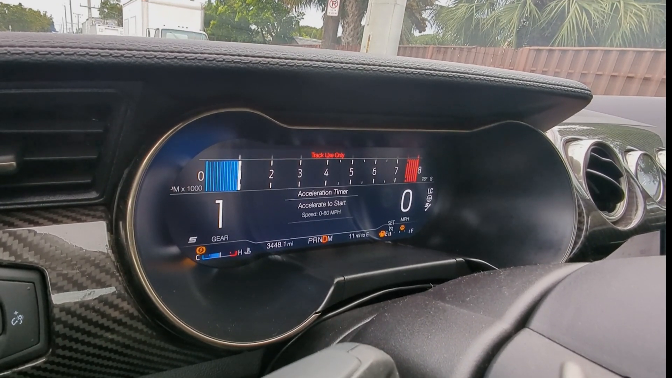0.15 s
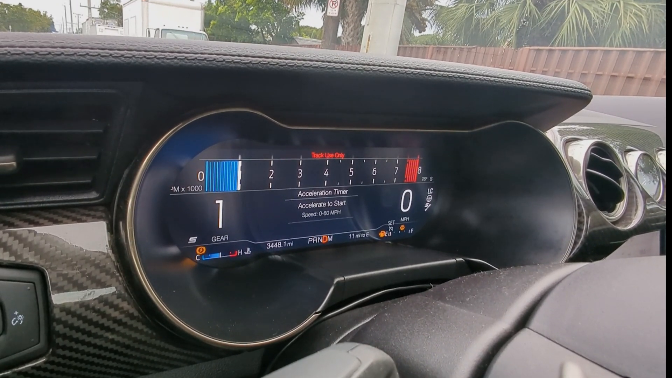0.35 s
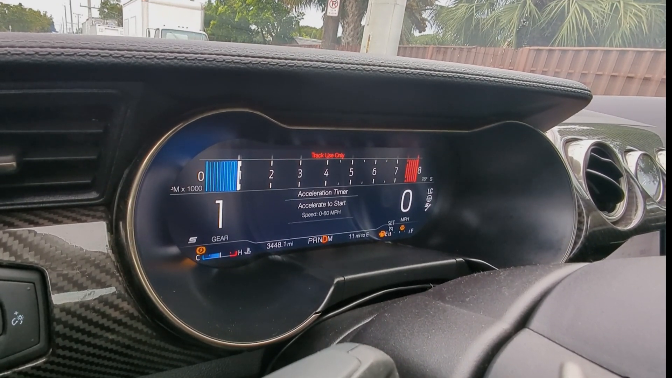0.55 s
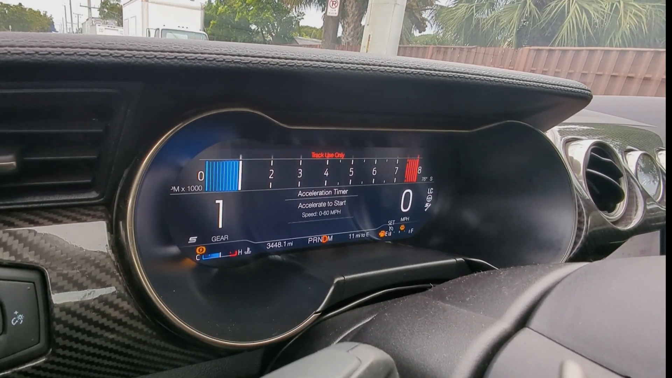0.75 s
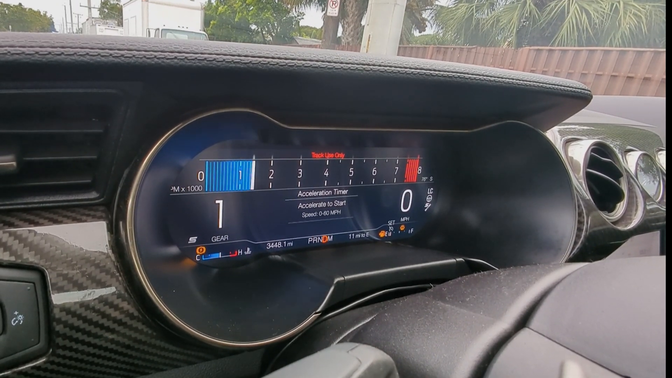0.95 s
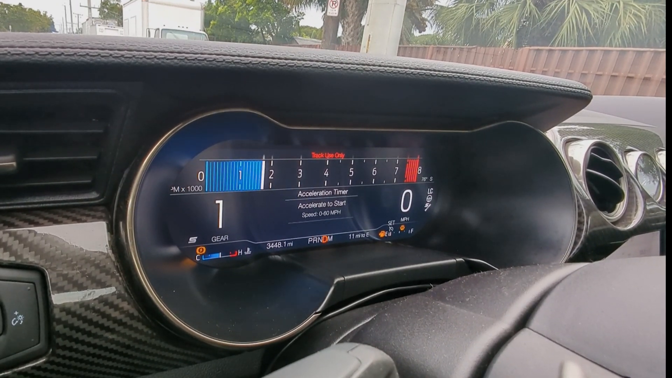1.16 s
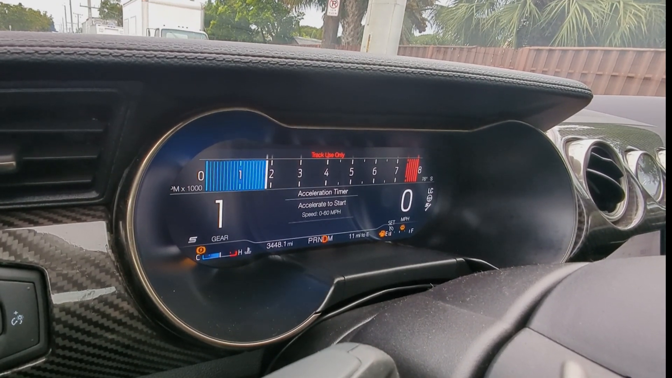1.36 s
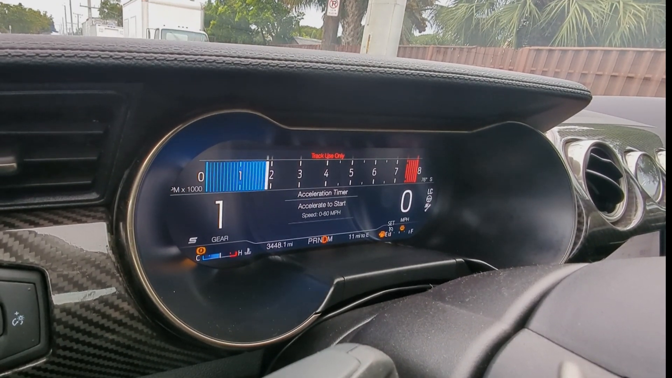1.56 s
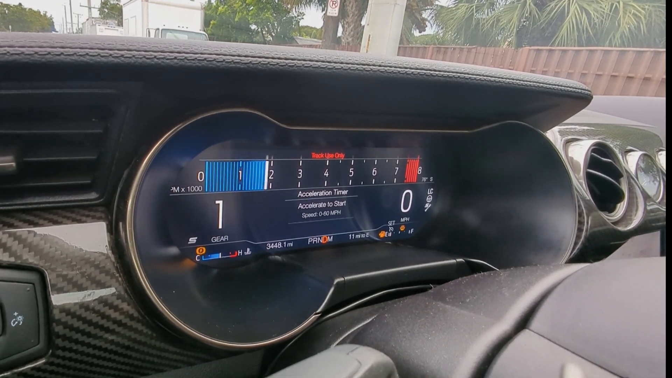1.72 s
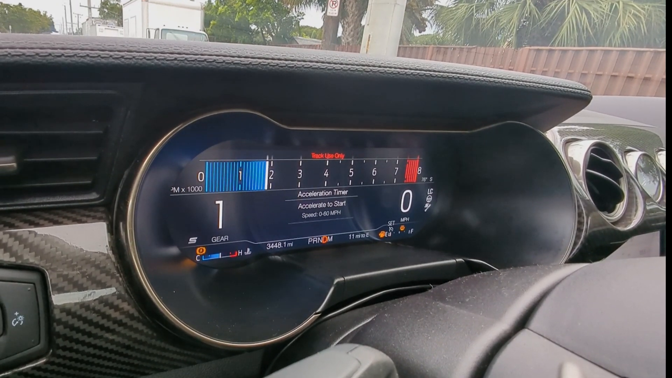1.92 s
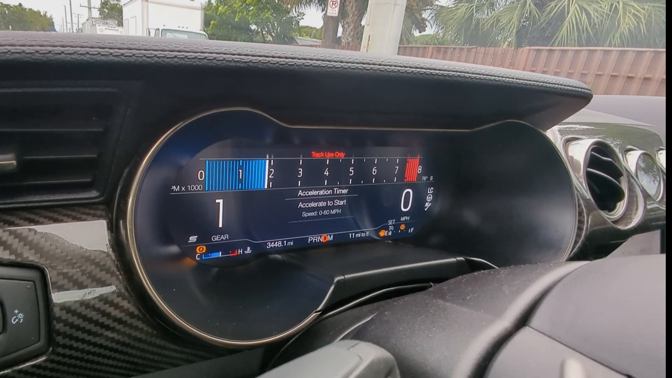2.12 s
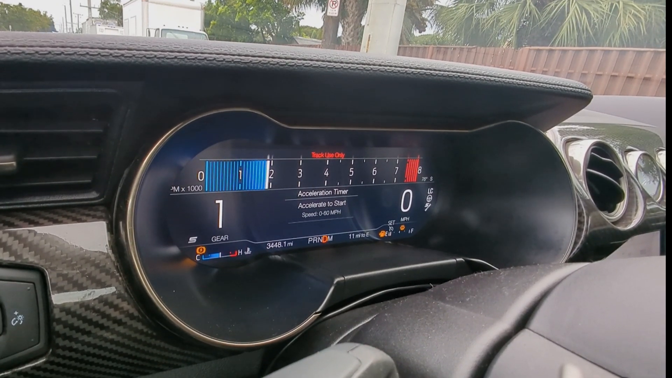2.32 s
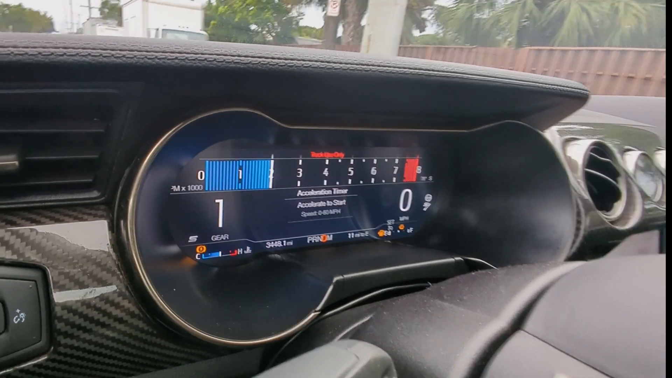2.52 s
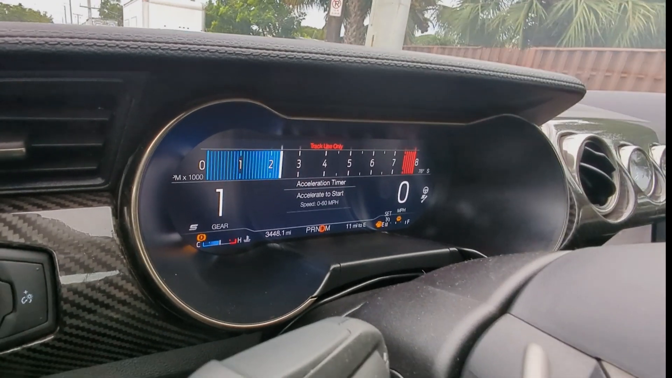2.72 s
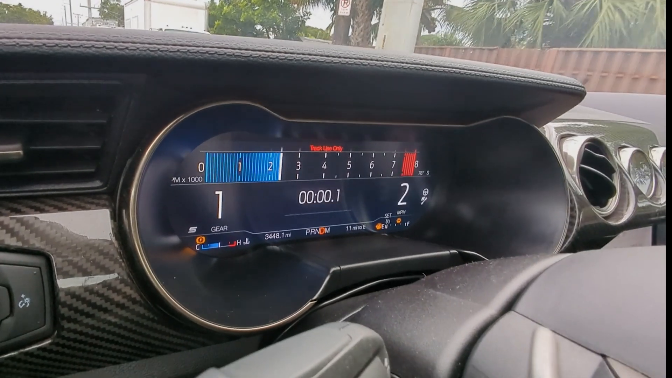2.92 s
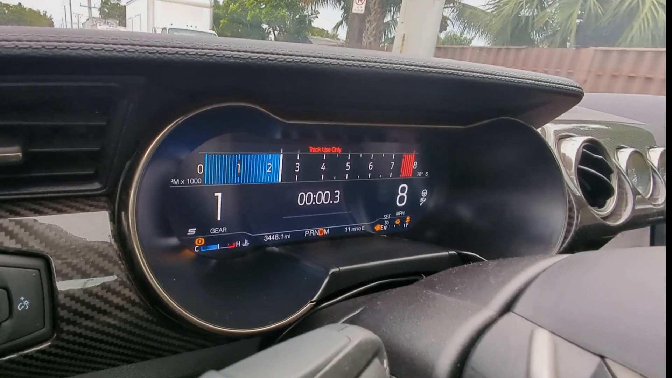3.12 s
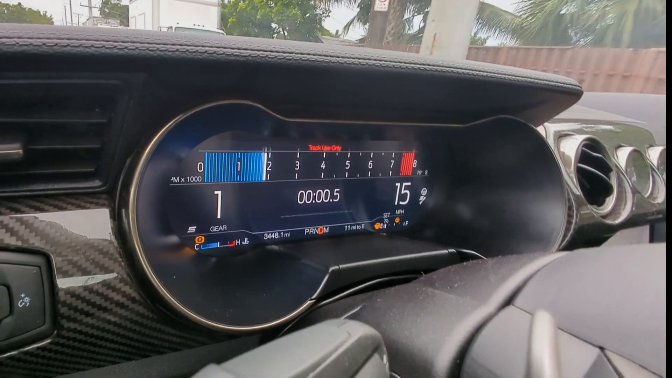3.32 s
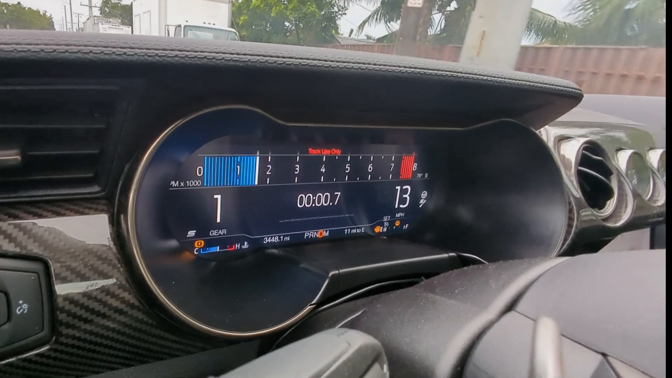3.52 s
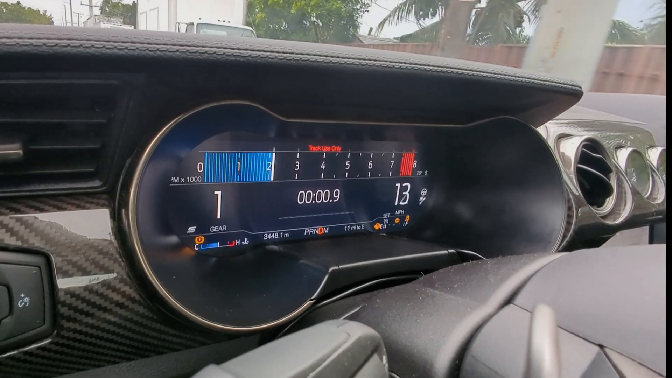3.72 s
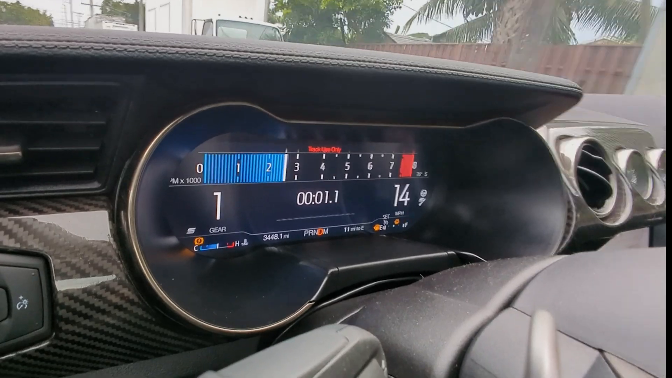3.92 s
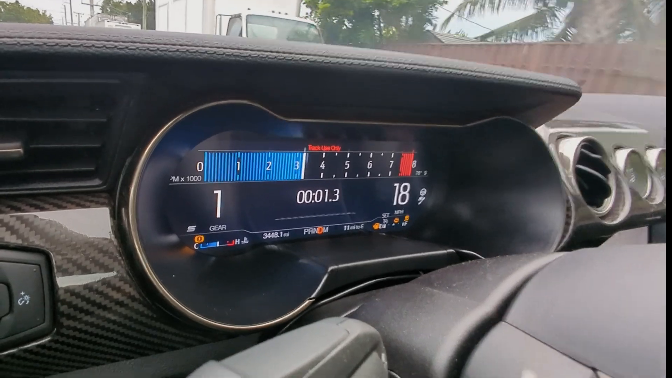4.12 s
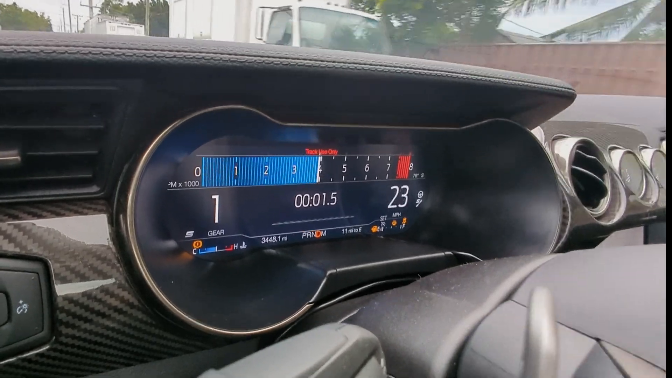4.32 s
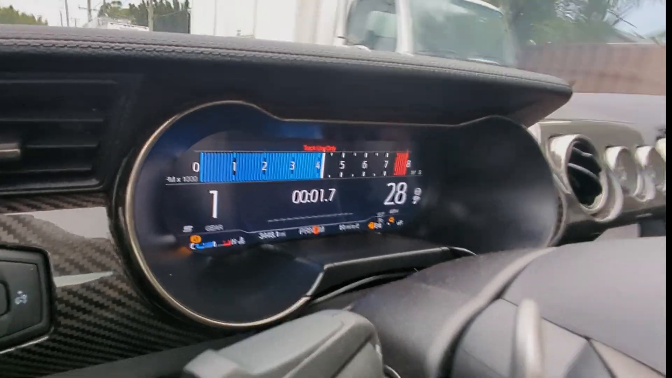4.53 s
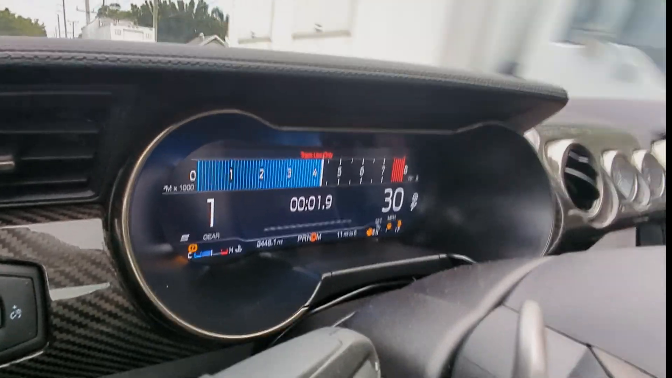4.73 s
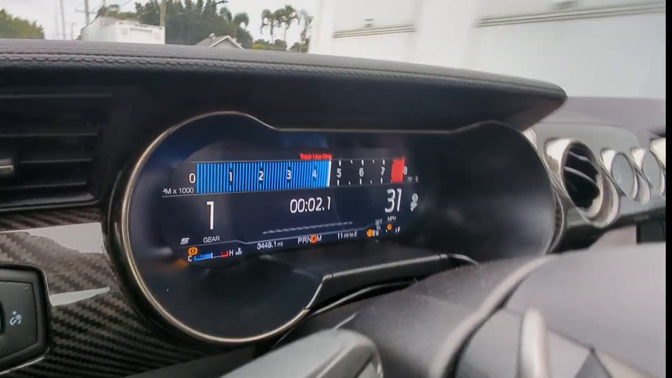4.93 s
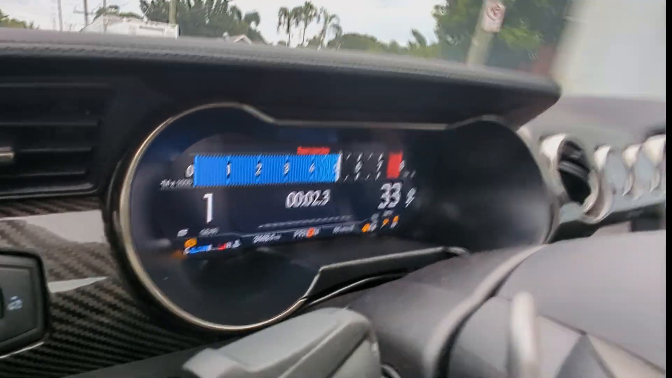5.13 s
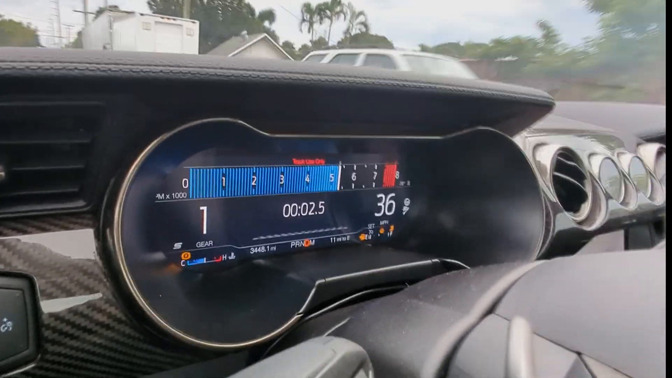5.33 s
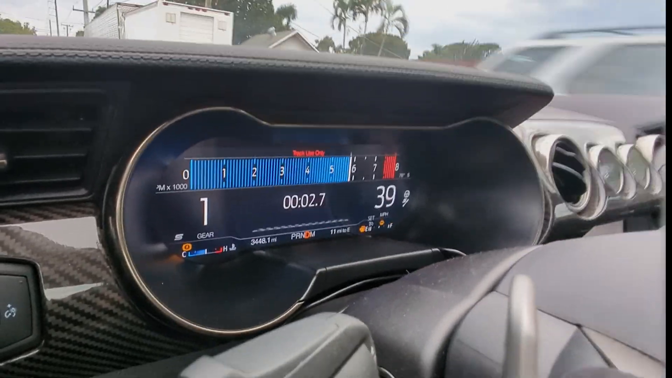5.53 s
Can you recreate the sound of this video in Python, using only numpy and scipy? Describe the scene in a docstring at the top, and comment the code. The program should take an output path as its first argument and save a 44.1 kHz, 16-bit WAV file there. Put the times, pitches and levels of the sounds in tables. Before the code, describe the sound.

Close inside a car cabin, a big V8 idles low and lumpy over faint vent hiss. Revs rise and hold, chopped by a stuttering limiter. It launches with a loud surge, a short tyre moan, air roar and trim rattle, sags, then climbs through more tyre moans and supercharger whine into a hard roar, briefly cut once, rising until the end.

```python
"""A supercharged V8 heard in the cabin: idle, revs held by a stuttering launch limiter, then a hard pull in first gear.
The engine is sine waves locked to its turning, plus puffs of noise: a firing note and uneven half orders.
The blower whines in multiples of its lobe rate, the tyres moan in gliding tones as they bite,
and the trim ticks in short noise bursts. Intake roar, thin hiss, road and ventilation are shaped noise."""
import sys
import numpy as np
from scipy import signal
from scipy.fft import rfft, irfft, next_fast_len
from scipy.io import wavfile
from scipy.ndimage import uniform_filter1d, minimum_filter1d, map_coordinates

SR = 44100
rng = np.random.default_rng(int(sys.argv[2]) if len(sys.argv) > 2 else 0)


def waveform_to_disk(signal):
    """Save audio, clipped to [-1, 1], as 16-bit WAV at the path in sys.argv[1]."""
    frames = np.transpose(np.atleast_2d(signal))
    scaled = np.clip(frames, -1, 1) * 32767
    samples = np.round(scaled).astype(np.int16)
    wavfile.write(sys.argv[1], SR, samples)


N = 249606  # length in samples

# how strongly the cabin passes a clean engine tone: pitch_hz, level_db
CABIN_DRONE = [(60, -15.5), (100, -13), (125, -8.5), (150, -5.5), (172, -8), (200, -14), (220, -17.5),
               (256, -14.5), (275, -13), (310, -17), (350, -11.5), (378, -8), (388, -23), (420, -24.5),
               (560, -28), (800, -27.5)]


def amp(db):
    """Turn decibels into a gain."""
    return 10 ** (np.asarray(db) / 20)


def unit(x):
    """Scale x to an average strength (rms) of 1."""
    return x / np.sqrt(np.mean(x ** 2) + 1e-20)


def along(points, hz):
    """Read a value at each frequency from (Hz, value) points, on a log frequency axis."""
    point_hz, values = np.transpose(points)
    return np.interp(np.log(hz + 1), np.log(point_hz + 1), values)


def curves(rows):
    """Draw straight lines between timed rows: one curve for each column after the time."""
    times_s, *columns = np.transpose(rows)
    return [np.interp(np.arange(N) / SR, times_s, column) for column in columns]


def wobble(rate):
    """A random curve of straight lines joining `rate` points a second."""
    knots = rng.standard_normal(int(N * rate / SR) + 4)
    return map_coordinates(knots, [np.arange(N) * rate / SR], order=1)


def filtered(x, response, mirror="odd"):
    """Filter x by a frequency response, with a fading mirror image after its end to avoid a sudden stop."""
    m = next_fast_len(N + SR // 2)
    widths = [(0, 0)] * (x.ndim - 1) + [(0, 300)]
    longer = np.pad(x, widths, mode="reflect", reflect_type=mirror)
    longer[..., N:] *= np.hanning(600)[300:]
    spectrum = rfft(longer, m) * response(np.fft.rfftfreq(m, 1 / SR))
    return irfft(spectrum, m)[..., :N]


def colour(points):
    """Make a filter whose gain follows (Hz, dB) points and which never sounds ahead of its input."""
    def response(hz):
        cepstrum = irfft(np.log(amp(along(points, hz)) + 1e-6))
        # folding the second half onto the first gives the minimum-phase filter
        cepstrum[1:len(cepstrum) // 2] *= 2
        cepstrum[len(cepstrum) // 2 + 1:] = 0
        return np.exp(rfft(cepstrum, 2 * len(hz) - 2))
    return response


def two_ears(x):
    """Bass reaches both sides alike; higher up each side gets its own mix of cabin paths."""
    # likeness of left and right (1 = the same): pitch_hz, likeness
    likeness = [(30, .995), (60, .98), (130, .998), (290, .93), (640, .2), (1000, 0)]
    # balance between the sides: pitch_hz, left_minus_right_db
    lean = [(60, 1), (110, 0), (200, 0), (380, 2), (700, 6.5), (1290, 1), (2400, 0)]

    def response(hz):
        turn = np.arccos(np.clip(along(likeness, hz), -1, 1)) / 2
        angles = np.cumsum(rng.normal(0, 1.5, size=1000))  # random phases, 25 Hz apart
        paths = np.exp(1j * np.interp(hz, np.arange(1000) * 25, angles))
        side = np.sin(turn) * paths
        sides = np.array([np.cos(turn) + side, np.cos(turn) - side])
        return sides * amp(np.outer([.5, -.5], along(lean, hz)))
    return filtered(x, response)


def hiss(spectrum, patchy_db):
    """Unrelated noise for each side, rms 1, with random patches of gain in time and frequency."""
    grid = signal.stft(rng.standard_normal((2, N)), nperseg=512)[2]
    patches = uniform_filter1d(rng.standard_normal(grid.shape[1:]), size=6, axis=0)
    patches = uniform_filter1d(patches, size=10, axis=1)
    pair = signal.istft(grid * amp(patchy_db * unit(patches)), nperseg=512)[1][:, :N]
    return unit(filtered(pair, lambda hz: amp(along(spectrum, hz)), mirror="even"))


def engine(hz, turns, open_db, cut_db):
    """The clean firing note, the half orders of eight unequal cylinders and the scatter from firing to firing."""
    # how burning changes with revs; scatter is against half orders, levels are relative:
    # firings_hz, rumble_db, scatter_db, boom_db, bark_db
    burning = [(58.4, -39, -1, 1.5, -0.5), (90, -31.5, -1.5, 5, 4.5), (119.4, -23.5, -0.5, 8, -7),
               (170, -25.5, 1.5, -5.5, 1), (200, -16, -4.5, -5, 1), (270, -18.5, -4, -9.5, 6),
               (325, -16, 0, -8.5, 3.5), (368, -21, 0, -7, 7), (400, -17.5, -4.5, -9, 6.5)]
    # relative strength of the orders in each eighth between firing orders: level_db
    uneven_db = [0, 0.5, -2, -4, -8.5, 0, 2, -2.5]
    # what the cabin makes of the rumble: pitch_hz, level_db
    cabin = [(25, -43.5), (50, -7), (90, -8.5), (125, 1.5), (156, 2.5), (215, -12.5), (255, -8.5),
             (300, -11.5), (365, -6), (410, -21), (500, -13.5), (660, -20), (730, -9), (790, -27.5),
             (1300, -39), (2000, -69.5)]
    note_per_load, rumble_per_load, bark_per_load = 1.096, 0.62, 0.45  # dB per dB of load
    rumble_per_cut = 1.05  # dB of rumble lost per dB of cut
    second_db = -9.5  # second firing order

    load_db = open_db - cut_db
    rumble_db, scatter_db, boom_db, bark_db = [along(np.array(burning)[:, [0, k]], hz) for k in range(1, 5)]

    note_db = note_per_load * open_db - cut_db + along(CABIN_DRONE, hz) + 1.2 * wobble(22)
    note = amp(note_db) * np.sin(2 * np.pi * turns)
    octave_db = load_db + second_db + along(CABIN_DRONE, 2 * hz) + 3 * wobble(10)
    octave = amp(octave_db) * np.sin(4 * np.pi * turns + .5 * wobble(6))

    orders = np.zeros(N)
    for k in range(2, 56):  # eighths of the firing rate
        if k not in (8, 16):  # the clean note and its octave are made above
            drift = rng.uniform(0, 2 * np.pi) + .35 * wobble(5)
            orders += amp(uneven_db[k % 8] + 2.2 * wobble(7)) * np.sin(2 * np.pi * turns * k / 8 + drift)
    orders *= np.sqrt(hz / hz.mean())  # sparser lines carry more power each

    puff = np.exp(2.5 * np.cos(2 * np.pi * turns))  # each firing lets out a puff of turbulent gas
    shape = colour(cabin)
    scatter = unit(filtered(puff * rng.standard_normal(N), shape))
    rumble = unit(filtered(orders, shape)) + amp(scatter_db) * scatter

    # split the rumble near 240 and 600 Hz, then rebalance its parts
    boom = filtered(rumble, lambda f: 1 / (1 + (f / 240) ** 6))
    bark = filtered(rumble, lambda f: 1 / (1 + (600 / (f + 1)) ** 8))
    body = rumble - boom - bark
    parts = body + amp(boom_db) * boom + amp(bark_db + bark_per_load * load_db) * bark
    rumble_gain = amp(rumble_db + rumble_per_load * open_db - rumble_per_cut * cut_db + 6.0)
    return np.sqrt(2) * (note + octave) + rumble_gain * parts


def banks(hz, turns, load_db):
    """The two cylinder banks beat at clean half orders, each wavering a little."""
    # eighths_of_firing_rate, level_db at 300 firings a second, tilt in dB per octave of revs
    bank_orders = [(3, -14, 1), (4, -11.5, 3.5), (5, -12.5, -5), (6, -7, 4), (10, -10, -6)]
    clear_hz, fade_db_per_hz = 210, 1.4  # clear above this firing rate, fading below it
    clear_db = load_db + fade_db_per_hz * np.minimum(0, hz - clear_hz)
    total = np.zeros(N)
    for eighths, db, tilt in bank_orders:
        k = round(eighths)
        revs_db = db + tilt * np.log2(hz / 300)
        level_db = clear_db + revs_db + along(CABIN_DRONE, hz * k / 8) + 1.5 * wobble(12)
        drift = rng.uniform(0, 2 * np.pi) + .25 * wobble(6)
        total += amp(level_db) * np.sin(2 * np.pi * turns * k / 8 + drift)
    return np.sqrt(2) * total


def blower(hz, turns):
    """Lobe tones from the second multiple up; each swells as it crosses a panel mode and breaks up."""
    # the blower sings once the bypass closes; levels before the panels: start_s, lowest_tone_db, upper_tones_db
    whine = [(2.46, -90, -60), (2.54, -42, 1.5), (2.93, -35.5, 0.5), (3.02, -40.5, -19),
             (3.25, -34.5, -24.5), (3.45, -32.5, -22.5), (3.62, -24.5, 0), (3.85, -25, 1),
             (4.1, -31.5, -1.5), (4.4, -39, -2), (4.6, -42.5, -9.5), (4.88, -42, 1), (5.2, -42, 0),
             (5.66, -36.5, -1)]
    # multiples 3 to 7 of the lobe rate: level_db at 1 kHz, tilt in dB per octave
    upper_tones = [(-47.5, 0), (-35.5, -7.5), (-45.5, -6.5), (-43.5, -6), (-43, -8.5)]
    # dash panel modes that pass the whine: pitch_hz, level_db
    panel_modes = [(560, 3), (660, 3.5), (780, -3), (1200, 4), (1500, 4.5), (1700, 0), (1920, 0.5),
                   (2250, 5), (2750, 4.5), (3300, 4.5), (3800, -4), (4450, 0), (5000, 1.5)]
    lobes_per_firing, damping = 2.4, .08

    lowest_db, upper_db = curves(whine)
    lobes = lobes_per_firing * turns + 0.025 * wobble(25)
    levels = [lowest_db]
    for k, (db, tilt) in enumerate(upper_tones, 3):
        octaves = np.log2(k * lobes_per_firing * hz / 1000)
        levels.append(upper_db + db + tilt * octaves)

    tones = np.zeros(N)
    for k, level_db in enumerate(levels, 2):
        fading = amp(8 - 11 * np.abs(wobble(24)) - 3 * np.abs(wobble(8)))
        tones += amp(level_db) * fading * np.sin(2 * np.pi * k * lobes)

    def panels(f):
        total = 0
        for mode_hz, db in panel_modes:
            drag = 1j * f * damping * mode_hz
            total = total + amp(db) * drag / (mode_hz * mode_hz - f * f + drag)
        return total
    return filtered(tones, panels)


def tyres():
    """Tyres stick and slip as they bite: gliding moans with two weak overtones."""
    # one list of rows per moan: start_s, pitch_hz, level_db
    moans = [
        [(2.42, 590, -34), (2.466, 585.5, -17.5), (2.54, 615, -33.5)],
        [(3.36, 507.4, -31), (3.558, 545, -19.5), (3.6, 632, -23)],
        [(3.91, 509.4, -41), (3.942, 472, -20.5), (3.99, 493, -17)],
    ]
    out = np.zeros(N)
    for rows in moans:
        fade_in = (rows[0][0] - .02, rows[0][1], -90)
        fade_out = (rows[-1][0] + 0.026, rows[-1][1], -90)
        hz, db = curves([fade_in, *rows, fade_out])
        phase = 2 * np.pi * np.cumsum(hz) / SR + 0.24 * wobble(60)
        tone = np.sin(phase) + amp(-24) * np.sin(2 * phase) + amp(-33) * np.sin(3 * phase)
        out += np.sqrt(2) * amp(db) * tone
    return out


def trim():
    """Plastic rattles: a grainy burst of contacts dying away, each with its own share of treble."""
    # levels before filtering: start_s, strength_db, treble_db, decay_s (time to fall by 60 dB)
    ticks = [(0.63, -47, 6.5, 0.035), (2.2757, -35.5, -24, .14), (2.6115, -39.5, -7, 0.069),
             (2.6354, -28, -5.5, 0.056), (2.6693, -37.5, -2.5, 0.066), (2.7656, -31, -0.5, 0.065),
             (4.5246, -33.5, -6, .12), (4.5494, -33, -4.5, 0.15), (4.5794, -42, -10, .08),
             (4.6214, -29, -3.5, 0.13), (4.6494, -33.5, -10, .1), (4.9097, -37, -5, .02),
             (5.1692, -23.5, -0.5, .035), (5.2121, -23.5, -3, 0.04), (5.2739, -18, -11.5, .03)]
    body, top = np.zeros((2, N + SR)), np.zeros((2, N + SR))
    t = np.arange(SR // 8) / SR
    for start_s, db, treble_db, decay_s in ticks:
        # each grain holds one random strength for 40 samples
        grains = np.repeat(rng.exponential(size=len(t) // 40 + 1), 40)[:len(t)]
        grains[:40] = 1
        fade = amp(db - 12 - 60 * t / decay_s)
        burst = fade * grains ** .4 * rng.standard_normal((2, len(t)))
        start = round(start_s * SR)
        body[:, start:start + len(t)] += burst
        top[:, start:start + len(t)] += amp(treble_db) * burst
    body_colour = colour([(800, -36.0), (2000, 16.5), (4000, 13.0), (7500, -3.0), (9000, -32.5)])
    top_colour = colour([(5000, -27.5), (8000, 7.5), (12000, 0.5), (15500, -9)])
    return filtered(body[:, :N], body_colour) + filtered(top[:, :N], top_colour)


def intake(turns):
    """Air roar that breathes a little with each firing; a thin hiss and the road's rumble grow with it."""
    # air roar through the drive: start_s, level_db
    air = [(0.0, -66.5), (1.3, -53.5), (2.08, -55.5), (2.44, -49.5), (2.56, -36), (2.74, -31), (2.95, -39),
           (3.25, -52), (3.41, -45), (3.62, -42), (3.86, -39.5), (4.11, -37), (4.52, -39), (4.9, -36.5),
           (5.15, -35), (5.4, -31), (5.66, -34)]
    # intake roar: pitch_hz, level_db per Hz
    roar_spectrum = [(470, -39.5), (800, -11.5), (884, -7.5), (1390, -14.5), (1510, -17.5), (1700, -17),
                     (2270, -18.5), (4490, -35), (7000, -44), (9100, -66.5), (15400, -120)]
    # hiss of belts and road: pitch_hz, level_db per Hz
    fizz_spectrum = [(1760, -31.5), (3000, -8), (4180, -11.5), (6760, -9), (7340, -10), (11600, -15),
                     (15600, -22)]
    # low rumble of the road: pitch_hz, level_db per Hz
    road_spectrum = [(25, -22), (50, -4), (75, 0), (110, -6), (300, -90)]
    full_air_db, full_fizz_db, fizz_per_air = -35, -56.5, .45  # dB, dB, dB per dB of air

    roar_db, = curves(air)
    fizz_db = full_fizz_db + fizz_per_air * (roar_db - full_air_db)
    pulse = 1 + .2 * np.cos(2 * np.pi * turns)
    roar = amp(roar_db + 1.5 * wobble(14)) * pulse * hiss(roar_spectrum, patchy_db=1.5)
    fizz = amp(fizz_db + 2 * wobble(14)) * hiss(fizz_spectrum, patchy_db=1.5)
    road = amp(fizz_db + 29) * hiss(road_spectrum, patchy_db=5.0)[0]  # the same on both sides
    return roar + fizz + road


def ventilation():
    """Steady air hiss from the vents: shaped noise at -54 dB."""
    # pitch_hz, level_db per Hz
    vent_spectrum = [(290, -37), (500, -0.5), (1220, -13.5), (1370, -14), (5600, -21.5), (6660, -23.5),
                     (15600, -48.5)]
    return amp(-54) * hiss(vent_spectrum, patchy_db=1.2)


def scene():
    """Drive engine and banks by revs and load, blower and intake pulse by revs; add tyres, trim and vents."""
    # idle, blip to the launch limiter, launch, bog, pull, traction cut, pull: start_s, firings_hz, load_db
    drive = [(0.0, 59.63, -14.5), (0.39, 58.9, -23), (0.455, 59.5, -11.5), (0.58, 58.3, -22),
             (0.76, 72.8, -13.5), (0.99, 100.8, -8.5), (1.05, 106, -7), (1.25, 128.4, -5),
             (1.4, 131.2, -9.5), (1.9, 130.6, -7.5), (2.41, 127.9, -7), (2.48, 139.4, 1), (2.6, 155.4, 3),
             (3.1, 156.6, -1.5), (3.31, 110.9, -10.5), (3.46, 109.3, -5), (3.55, 120.8, -1), (3.7, 147, 0),
             (3.83, 169.8, 0), (4.0, 216.4, -2.5), (4.19, 258.1, 2), (4.3, 268.5, -4), (4.46, 279.9, -2),
             (4.61, 288.7, -18), (4.69, 280.6, -7), (4.82, 299.7, -11.5), (4.9, 314.6, 0),
             (5.08, 345.8, -1), (5.27, 356.6, -4.5), (5.38, 383.5, 2), (5.66, 405.8, -1.5)]
    # the firing falters, mostly where the launch limiter cuts the spark: centre_s, depth_db
    cuts = [(0.9, 13.5), (1.02, 9.5), (1.09, 4), (1.17, 4.5), (1.31, 10.5), (1.47, 8), (1.628, 22),
            (1.69, 1.5), (1.805, 14.5), (1.92, 10.5), (2.062, 16), (2.228, 18.5), (2.395, 23.5)]
    recovery_s = 0.027  # on either side of a cut

    hz, load_db = curves(drive)
    t = np.arange(N) / SR
    cut_db = sum(depth_db * np.exp(-np.abs(t - centre_s) / recovery_s) for centre_s, depth_db in cuts)
    turns = np.cumsum(hz) / SR  # firings so far
    motor = engine(hz, turns, load_db, cut_db) + banks(hz, turns, load_db)
    car = two_ears(motor + blower(hz, turns) + tyres())
    return car + trim() + intake(turns) + ventilation()


def record(dry):
    """A fast limiter holds the peaks; the microphone loses the deepest bass and nothing passes the band limit."""
    top_hz = 15730
    clean = filtered(dry, lambda hz: 1 / (1 + (40 / (hz + 1)) ** 4))
    need = np.minimum(1, .95 / (np.abs(clean).max(axis=0) + 1e-9))
    # hold the lowest gain around each peak, then smooth it twice
    held = minimum_filter1d(need, size=441)
    gain = uniform_filter1d(uniform_filter1d(held, size=221), size=221)
    return filtered(clean * gain, lambda hz: hz < top_hz)


dry = scene()
out = record(dry)
waveform_to_disk(out)
```